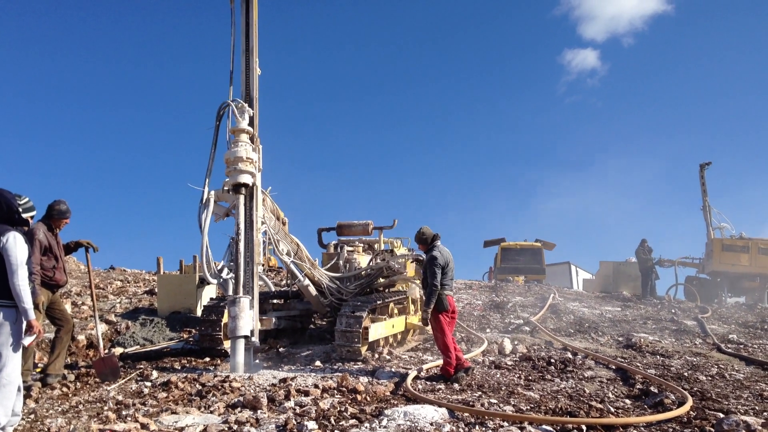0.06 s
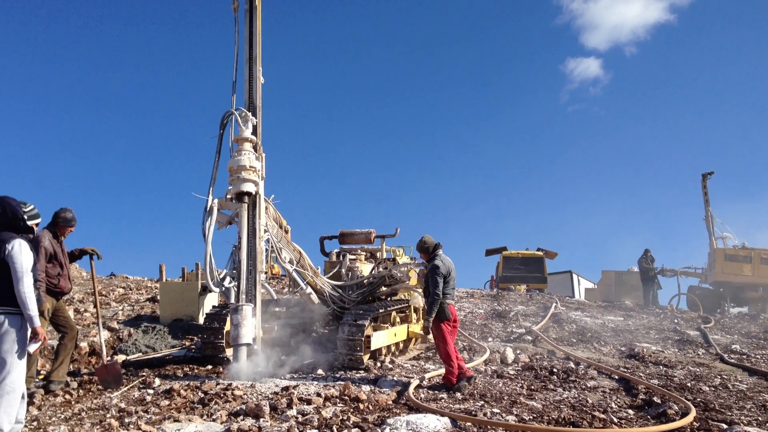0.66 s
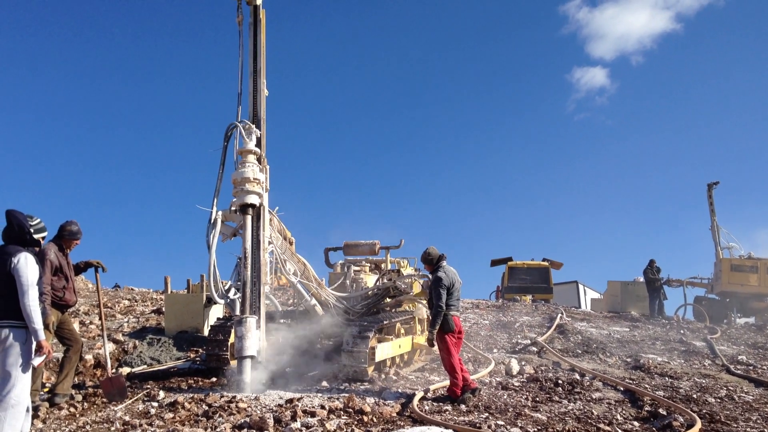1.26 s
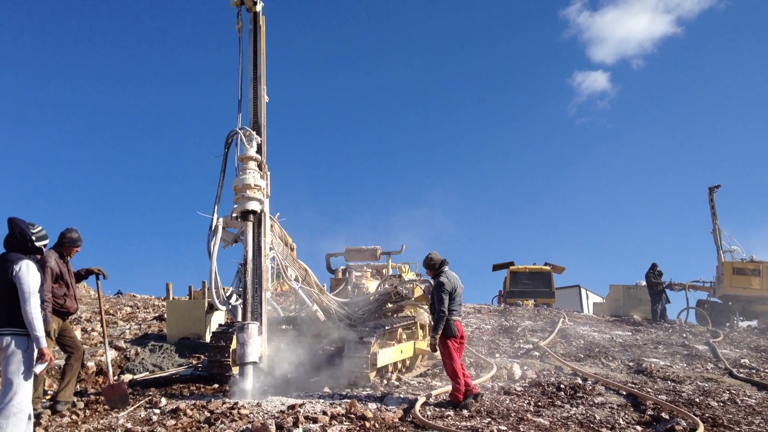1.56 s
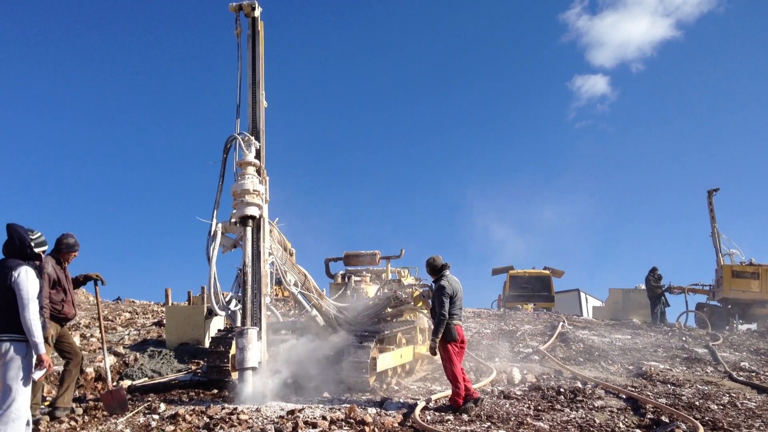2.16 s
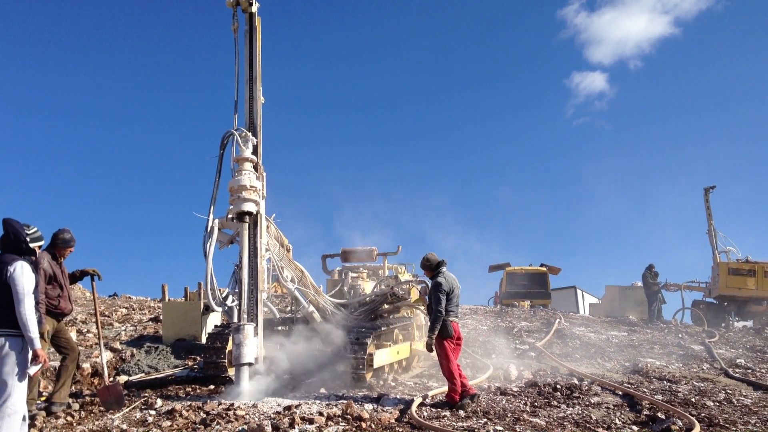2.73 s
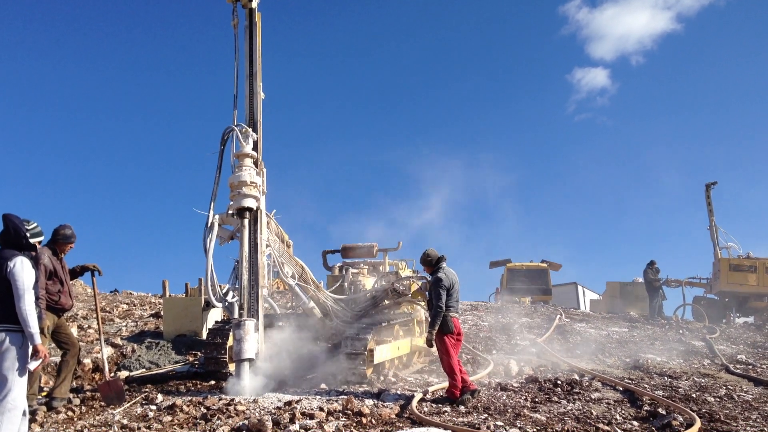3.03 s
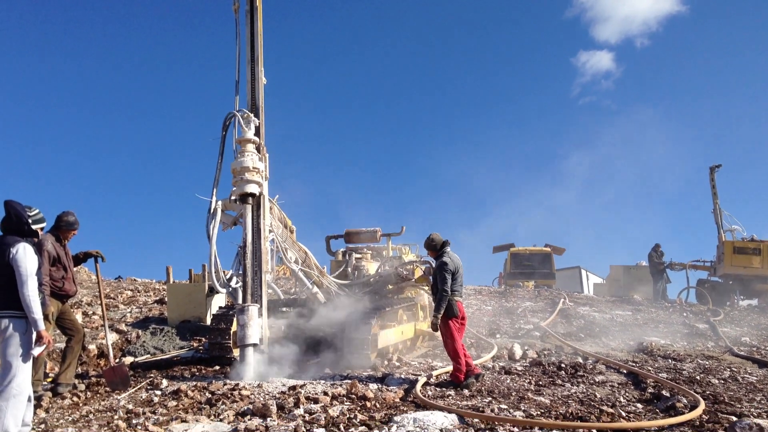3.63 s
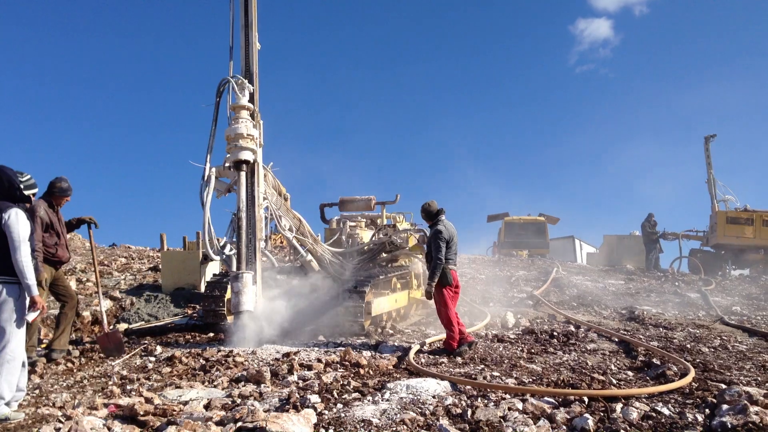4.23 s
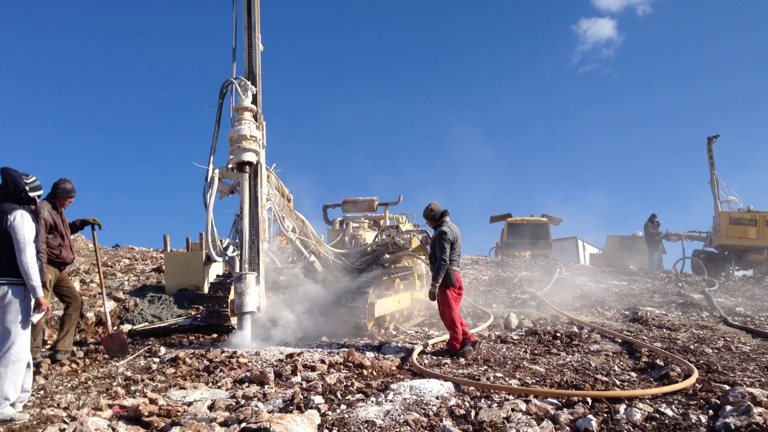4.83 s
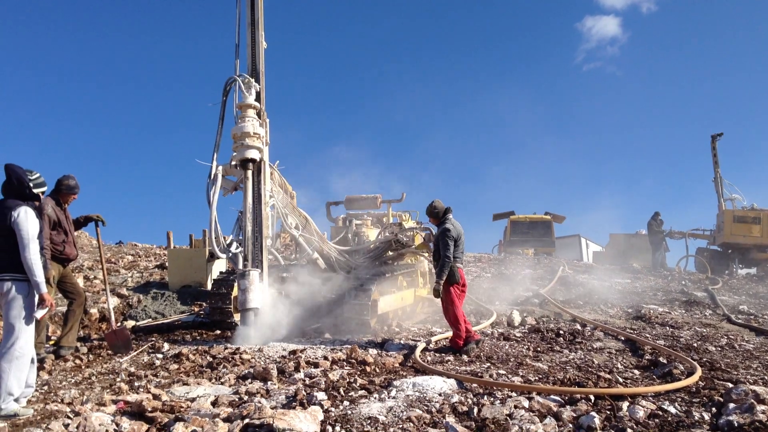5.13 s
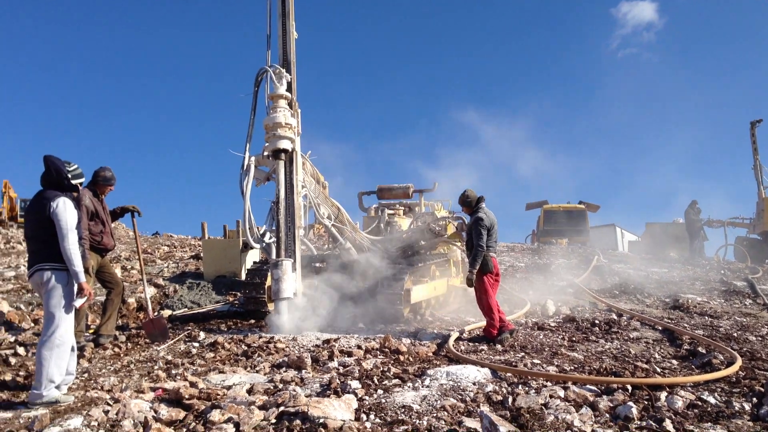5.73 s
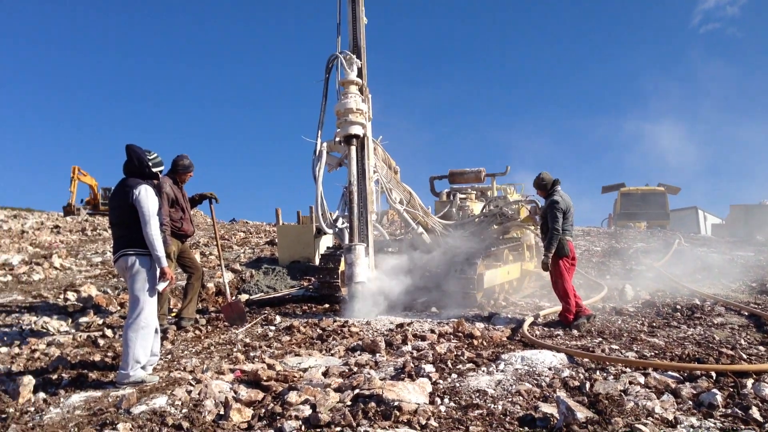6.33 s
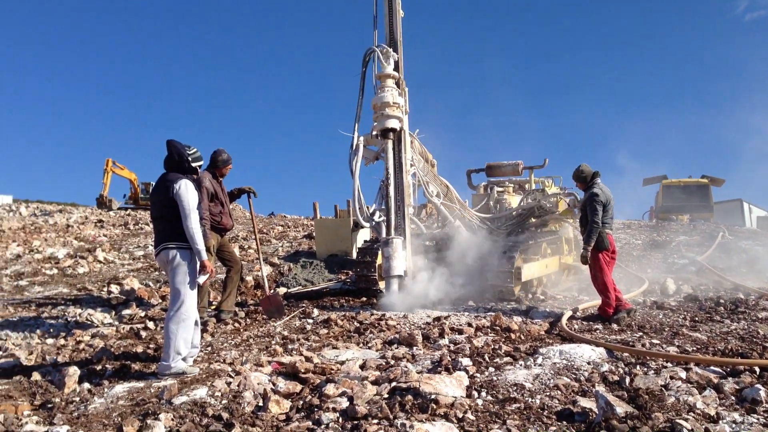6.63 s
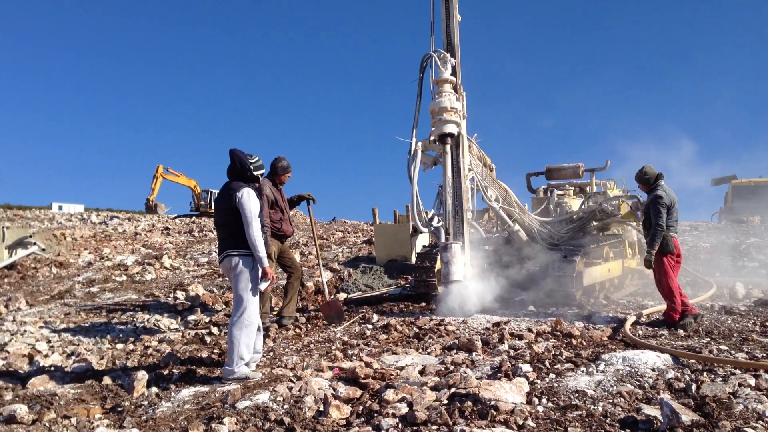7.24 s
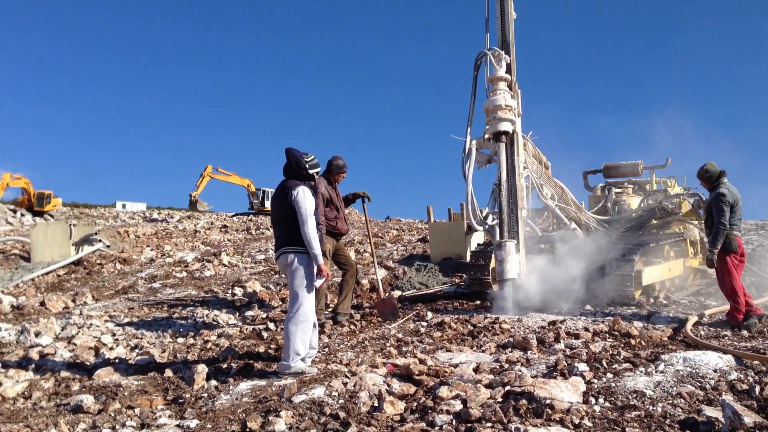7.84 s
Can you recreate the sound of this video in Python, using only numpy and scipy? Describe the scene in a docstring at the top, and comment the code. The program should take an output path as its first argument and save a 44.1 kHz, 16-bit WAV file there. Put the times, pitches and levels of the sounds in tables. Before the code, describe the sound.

A rock drill hammers rapidly, its steel clanging and ringing over puffing exhaust, hissing air and rumbling engines.

```python
"""A pneumatic crawler drill on an open hillside, heard through one microphone.
Air blasts through the hole; a third of a second in, the piston starts hammering, about 17 blows a second.
Each cycle: a puff of exhaust, the piston's clang on the drill steel, a second puff on the return stroke.
The long steel rings on between blows; flushing air hisses and engines rumble behind.
At six seconds the microphone swings left, and the sound turns a little hollow and brighter."""
import sys
import numpy as np
from scipy import signal
from scipy.fft import rfft, irfft
from scipy.io import wavfile

SR = 44100
rng = np.random.default_rng(int(sys.argv[2]) if len(sys.argv) > 2 else 0)


def wav_record(signal):
    """Record a signal, one row per channel, as 16-bit PCM in the file named by sys.argv[1]."""
    frames = np.transpose(np.atleast_2d(signal))
    bounded = np.clip(frames, -1, 1)
    # unit amplitude maps onto the largest positive 16-bit level
    quanta = np.round(bounded * 32767).astype(np.int16)
    wavfile.write(sys.argv[1], SR, quanta)


N = 352359
TIME = np.arange(N) / SR
FIRST_BLOW_S, BLOW_COUNT = 0.322, 129


def from_db(db):
    """Decibels to gain."""
    return 10 ** (np.asarray(db) / 20)


def curve_at(rows, times):
    """Each value column of a curve, read at the given seconds."""
    knots, *columns = np.transpose(rows)
    return [np.interp(times, knots, column) for column in columns]


def drift(rate_hz):
    """A slow random wander with spread 1."""
    knots = rng.standard_normal(int(N / SR * rate_hz) + 3)
    return 1.22 * np.interp(TIME * rate_hz, np.arange(len(knots)), knots)


def scatter(blows):
    """One chance value for each blow, with spread about 1 and no outliers."""
    return np.clip(rng.standard_normal(len(blows)), -2, 2)


def clicks(times, heights):
    """A train of single-sample pushes."""
    samples = np.clip(np.round(times * SR).astype(int), 0, N)
    return np.bincount(samples, heights, N + 1)[:N]


def colour(x, spectrum, size=8192):
    """Minimum-phase filter of unit energy: the spectrum sets the tone, not the level."""
    hz = np.maximum(np.arange(size // 2 + 1) * SR / size, 1)
    knot_hz, knot_db = np.transpose(spectrum)
    db = np.interp(np.log(hz), np.log(knot_hz), knot_db)
    cepstrum = irfft(np.log(from_db(db)))[:size // 2]
    cepstrum[1:] *= 2
    response = irfft(np.exp(rfft(cepstrum, size)))
    return signal.oaconvolve(x, response / np.linalg.norm(response))[:N]


def burst(pushes, rise_s, hold_s, t60):
    """Noise that swells after each push, holds briefly, then dies away."""
    t = TIME[:SR // 8]
    envelope = (1 - np.exp(-t / rise_s)) * from_db(-60 * np.maximum(t - hold_s, 0) / t60)
    return signal.oaconvolve(pushes, envelope)[:N] * rng.standard_normal(N)


def ring(pushes, hz, t60):
    """A unit push sets a sine of height 1 ringing."""
    radius, angle = from_db(-60 / (t60 * SR)), 2 * np.pi * hz / SR
    poles = [1, -2 * radius * np.cos(angle), radius ** 2]
    return signal.lfilter([0, np.sin(angle)], poles, pushes + 1e-18)


def resonance(x, hz, width_hz):
    """Two-pole band-pass with gain 1 at its peak."""
    radius = np.exp(-np.pi * width_hz / SR)
    poles = [1, -2 * radius * np.cos(2 * np.pi * hz / SR), radius ** 2]
    return signal.lfilter((1 - radius ** 2) / 2 * np.array([1, 0, -1]), poles, x + 1e-18)


# The low roar and the high hiss behind the drill. Each row: frequency in Hz, relative level in dB.
ROAR_SPECTRUM = [(25, -40), (60, -24), (100, -1.5), (170, 5.5), (300, 1), (450, -3.5), (750, -5.5),
                 (1100, -8), (1700, -12.5), (3000, -17), (8000, -43)]
HISS_SPECTRUM = [(500, -17), (1500, 7.5), (2300, 5), (3300, 5), (4500, 4), (6500, 4), (7500, 0),
                 (10000, -2), (13000, 0.5), (15500, 2.5)]
# The hiss and roar dip as the hammering starts, then come back and waver.
# Each row: time in seconds, change of level in dB.
AIR_LEVEL = [(0.38, -4), (0.47, -0.5), (0.68, 1.5), (1.3, 2.5), (1.48, -2), (1.8, 0), (2.2, -2.5),
             (3.3, 1.5), (5.0, -0.5), (6.1, 1), (7.0, -1), (7.95, 0)]

def air_and_engines(blast_roar_db=-26, blast_hiss_db=-25.2, roar_db=-31.5, hiss_db=-32):
    """Air blasts through the hole, then hisses on more quietly behind the blows, over the engines' roar."""
    blast = np.clip((FIRST_BLOW_S - TIME) * 40 + 1, 0, 1)
    waver_db = curve_at(AIR_LEVEL, TIME)[0] + 1.7 * drift(rate_hz=10)
    flutter_db = 2.5 * drift(rate_hz=25)
    roar_gain = from_db(blast * blast_roar_db + (1 - blast) * (roar_db + waver_db + flutter_db))
    hiss_gain = from_db(blast * blast_hiss_db + (1 - blast) * (hiss_db + waver_db))
    roar = colour(rng.standard_normal(N), ROAR_SPECTRUM)
    hiss = colour(rng.standard_normal(N), HISS_SPECTRUM)
    return roar_gain * roar + hiss_gain * hiss


# The exhaust, choked for a while midway. Each row: time in seconds, relative level in dB.
EXHAUST_STRENGTH = [(0.32, -10.5), (0.4, -18), (0.8, -12.5), (1.2, -13.5), (1.48, -16.5), (1.7, -10),
                    (2.15, -15.5), (2.9, -17), (3.12, -23), (3.33, -16), (3.75, -30.5), (4.15, -29),
                    (4.55, -18), (5.05, -19.5), (6.85, -16.5), (7.3, -21.5), (7.74, -16.5), (7.93, -24.5)]
# How the port opens. Each row: time in seconds, sharpness from 0 to 1, return puff's offset in dB.
PORT_OPENING = [(0.3, 0.82, -10), (0.65, 0.46, 1), (1.3, 0.17, -10), (1.65, 0.53, -6), (2.0, 0.05, -0.5),
                (2.45, 0.72, -2.5), (2.8, 0.18, -8), (3.8, 0.36, -14), (4.6, 0.85, -3.5), (6.0, 0.59, -3.5),
                (6.8, 0.22, -7), (7.9, 0.5, -1.5)]
# Lone heavy puffs, as air first lifts the piston and whenever it stumbles.
# Each row: start in seconds, relative level in dB.
LONE_PUFFS = [(0.2857, -10.5), (1.117, -16), (1.146, -21), (2.896, -15.5), (3.255, -24), (3.528, -18.5)]
# The pulse of a sharp and of a sluggish port. Each row: frequency in Hz, relative level in dB.
SHARP_PUFF_SPECTRUM = [(30, -45), (70, -33.5), (100, -20), (135, -2), (170, -0.5), (205, -3.5), (245, 1.5),
                       (300, -6), (375, -4), (480, -17.5), (880, -20.5), (1300, -32.5), (4000, -50)]
SOFT_PUFF_SPECTRUM = [(30, -54), (70, -24), (100, -22), (135, -3), (175, 3.5), (225, -1.5), (300, -16.5),
                      (400, -26.5), (700, -28), (2000, -50.5)]

def exhaust(blows, lead_s=0.003806, return_share=0.435, jitter_s=0.00208, echo_s=0.01167):
    """The port opens just before each blow and again on the return: a pulse and a spit of air."""
    strength_db, = curve_at(EXHAUST_STRENGTH, blows)
    port, return_offset_db = curve_at(PORT_OPENING, blows)
    unsteady = 1 - port ** 2  # a sluggish port puffs less evenly
    main_db = strength_db + 2.5 * unsteady * scatter(blows)
    return_db = strength_db + return_offset_db + 3.5 * unsteady * scatter(blows)
    return_s = blows + return_share * np.gradient(blows) + jitter_s * unsteady * scatter(blows)
    lone_s, lone_db = np.transpose(LONE_PUFFS)
    times = np.r_[blows - lead_s, return_s, lone_s]
    heights = -from_db(np.r_[main_db + 28.5, return_db + 27.5, lone_db + 28.5])
    sharpness = np.r_[port, 0.91 * port, np.zeros(len(lone_s))]
    sharp = colour(clicks(times, heights * sharpness), SHARP_PUFF_SPECTRUM)
    soft = colour(clicks(times, heights * (1 - sharpness)), SOFT_PUFF_SPECTRUM)
    # the pulse comes back, duller, off the carrier
    echo = colour(clicks(times + echo_s, heights), SOFT_PUFF_SPECTRUM)
    spit = burst(clicks(times, np.abs(heights)), rise_s=0.00013, hold_s=0.0051, t60=0.024)
    return sharp + soft + from_db(-21) * echo + from_db(-41.5) * colour(spit, ROAR_SPECTRUM)


# Short-lived modes of the chuck (first row), hammer body and mast.
# Each row: frequency in Hz, width in Hz, relative level in dB.
RIG_MODES = [(2870, 1230, -14), (2206, 68, -7.5), (2418, 190, -8.5), (3206, 123, -2.5), (3743, 88, -15.5),
             (4134, 94, -10), (4490, 150, -13.5), (5007, 46, -11.5), (6230, 100, -31), (12600, 1100, -13)]
# At times the steel rides loose in its chuck. Each row: time in seconds, boost of the chuck's ring in dB.
CHUCK_RING = [(0.35, 14.5), (0.9, -1), (4.3, 0), (4.65, 14.5), (6.2, 14), (6.55, 13), (7.8, 9.5)]

def rig_clank(blows, blow_db):
    """Each blow shakes the rig's modes in a new mixture, so no two clanks have the same colour."""
    chuck_db, = curve_at(CHUCK_RING, blows)
    clank = np.zeros(N)
    for k, (hz, width_hz, mode_db) in enumerate(RIG_MODES):
        swell_db = chuck_db if k == 0 else 0
        mixture_db = rng.uniform(-5, 5, len(blows))
        pushes = clicks(blows, from_db(blow_db + mode_db + swell_db + mixture_db))
        shake = burst(pushes, rise_s=0.00064, hold_s=0.0026, t60=0.053)
        clank += resonance(shake, hz, width_hz) * np.sqrt(SR / (np.pi * width_hz))
    return clank


# Modes of the drill steel, led by its low ring, the one beside the chuck's mode, and its high ring.
# Each row: frequency in Hz, relative level in dB, seconds to fade by 60 dB.
STEEL_MODES = [(1997, -16.5, .3), (2904, -26, .17), (6005, -15, .15), (890, -21.5, .12), (1407, -25, .12),
               (1833, -25.5, .3), (2338, -23, .26), (3657, -24, .3), (4439, -25, .17), (5066, -19.5, .17),
               (5415, -28, .17), (5698, -23.5, .26), (6048, -15, .12), (6659, -27, .12), (8155, -33, .22),
               (8586, -33, .26), (9302, -35, .2), (10690, -30, .2)]
# The rings swell and fade as the steel turns. Each row: time in seconds, low ring in dB, high ring in dB.
RING_SWELL = [(0.4, -3, -11), (0.9, -12, 4), (1.3, 4.5, -4.5), (1.65, -10, 2), (2.65, 1, -2), (3.25, 5, 0),
              (3.6, -9, 6.5), (4.3, 0.5, 0.5), (4.75, 2, 6), (5.4, -11, 2), (6.2, -1.5, 2), (6.6, -0.5, 6),
              (7.1, 1, -10), (7.9, -3, -1)]

def steel_ring(blows, blow_db, mean_delay_s=0.002, scatter_db=3.5, tilt_db_per_octave=0.56):
    """Every blow rings each mode of the rod with its own strength; the grip of the rock damps it."""
    low_db, high_db = curve_at(RING_SWELL, blows)
    chuck_db, = curve_at(CHUCK_RING, blows)
    swells = (low_db, chuck_db, high_db)
    ringing = np.zeros(N)
    for k, (hz, mode_db, t60) in enumerate(STEEL_MODES):
        swell_db = swells[k] if k < len(swells) else 2.5 * np.interp(blows, TIME, drift(rate_hz=4))
        tilt_db = tilt_db_per_octave * np.log2(hz / STEEL_MODES[0][0])
        chance_db = scatter_db * rng.standard_normal(len(blows))
        strength = from_db(blow_db + mode_db + tilt_db + swell_db + chance_db)
        starts = blows + mean_delay_s * (0.5 + rng.random(len(blows)))
        ringing += ring(clicks(starts, strength), hz, t60)
    return from_db(4) * ringing


# The three parts of a blow at the microphone. Each row: frequency in Hz, relative level in dB.
CLANG_SPECTRUM = [(300, -26), (1000, -22), (1700, -11), (2050, 0.5), (2500, -7.5), (2800, -8.5), (3100, -5),
                  (5000, -5.5), (6600, -8.5), (7400, -13), (10000, -22.5), (15500, -27)]
CRACK_SPECTRUM = [(2000, -42), (4000, 8), (6500, 4), (7500, 1), (10000, -1.5), (13000, -4.5), (15500, -11)]
THUD_SPECTRUM = [(120, -17.5), (300, -3), (500, -5), (600, 2.5), (670, -3), (750, 3), (820, -4.5), (890, 2),
                 (1010, -11.5), (1280, -3.5), (3000, -22)]
# Harder rock gives a brighter blow. Each row: time in seconds, boost of the crack in dB.
ROCK_HARDNESS = [(0.4, -8), (1.5, -3.5), (2.05, 6), (2.5, -6), (4.0, 2.5), (4.8, 2), (5.9, -6.5), (6.35, 3),
                 (7.1, 0), (7.7, -1), (7.95, -4)]

def hammer(blows, blow_db):
    """The piston cracks on the shank and rattles the rig; the bit crushes rock with a duller thud."""
    pushes = clicks(blows, from_db(blow_db))
    clang = colour(burst(pushes, rise_s=0.0032, hold_s=0.0033, t60=0.063), CLANG_SPECTRUM)
    hardness_db = curve_at(ROCK_HARDNESS, blows)[0] + 5 * scatter(blows)
    crack_pushes = clicks(blows, from_db(blow_db + hardness_db))
    crack = colour(burst(crack_pushes, rise_s=0.0023, hold_s=0.001, t60=0.085), CRACK_SPECTRUM)
    thud = colour(burst(pushes, rise_s=0.00013, hold_s=0.0054, t60=0.066), THUD_SPECTRUM)
    return from_db(-0.5) * clang + from_db(-10) * crack + from_db(-6) * thud


# The piston's pace hunts a little as the bit turns. Each row: time in seconds, blows per second.
PISTON_PACE = [(0.32, 16.227), (0.45, 16.853), (1.18, 17.113), (1.28, 16.335), (1.82, 17.325),
               (2.35, 16.712), (2.92, 16.797), (3.56, 16.413), (4.16, 16.998), (4.83, 15.976),
               (5.33, 17.222), (5.82, 16.034), (6.32, 17.233), (6.65, 16.139), (7.5, 16.894),
               (7.83, 15.816), (7.95, 18.519)]
# How hard the bit bites, unsteady until it has seated. Each row: time in seconds, relative level in dB.
BIT_BITE = [(0.32, -17), (0.56, -20.5), (0.8, -17), (1.05, -19.5), (1.24, -16), (1.57, -20.5), (1.88, -16),
            (2.7, -16), (4.2, -15), (5.0, -17.5), (5.95, -16.5), (6.4, -15.5), (6.68, -16.5), (6.85, -21),
            (6.99, -17.5), (7.95, -16.5)]

def piston_blows(scatter_db=1.25):
    """The piston strikes once a cycle: the blows' times in seconds and their levels in dB."""
    pace, = curve_at(PISTON_PACE, TIME)
    cycles = np.cumsum(pace) / SR
    first_cycle = np.interp(FIRST_BLOW_S, TIME, cycles)
    blows = np.interp(first_cycle + np.arange(BLOW_COUNT), cycles, TIME)
    bite_db, = curve_at(BIT_BITE, blows)
    return blows, bite_db + scatter_db * scatter(blows)


# The microphone swings to the left. Each row: time in seconds, share of the turn from 0 to 1.
MICROPHONE_TURN = [(6.0, 0), (6.8, 1), (8.0, 0.9)]

def microphone_swing(x):
    """As the microphone swings round, the sound turns a little hollow and brighter at the top."""
    turn, = curve_at(MICROPHONE_TURN, TIME)
    hollow = resonance(x, hz=2680, width_hz=300)
    bright = resonance(x, hz=10500, width_hz=2300)
    return x + turn * (0.48 * bright - hollow)


def scene():
    """The whole rig reaches one microphone on the hillside, alike in both channels."""
    blows, blow_db = piston_blows()
    puffs = exhaust(blows)
    strikes = hammer(blows, blow_db) + rig_clank(blows, blow_db) + steel_ring(blows, blow_db)
    mono = microphone_swing(puffs + strikes + air_and_engines())
    return np.array([mono, mono])


def record(dry, ceiling=0.72, cutoff_hz=15300):
    """The recorder rounds the loudest peaks and cuts the highest treble."""
    rounded = dry / (1 + (dry / ceiling) ** 4) ** 0.25
    lowpass = signal.ellip(10, 0.1, 80, cutoff_hz, fs=SR, output="sos")
    return signal.sosfilt(lowpass, rounded)


dry = scene()
out = record(dry)
wav_record(out)
```